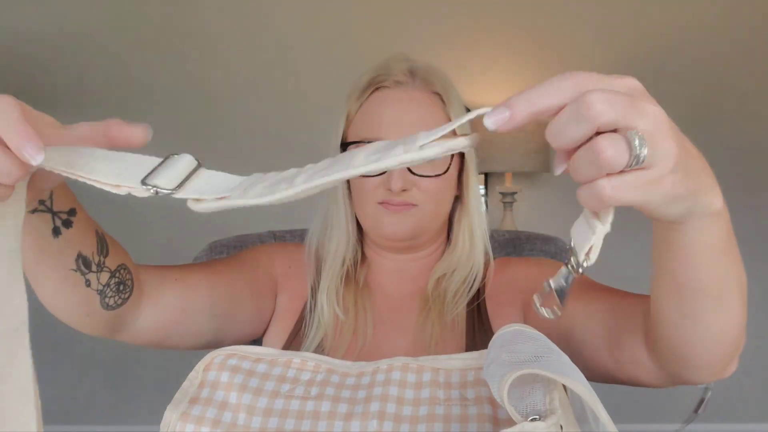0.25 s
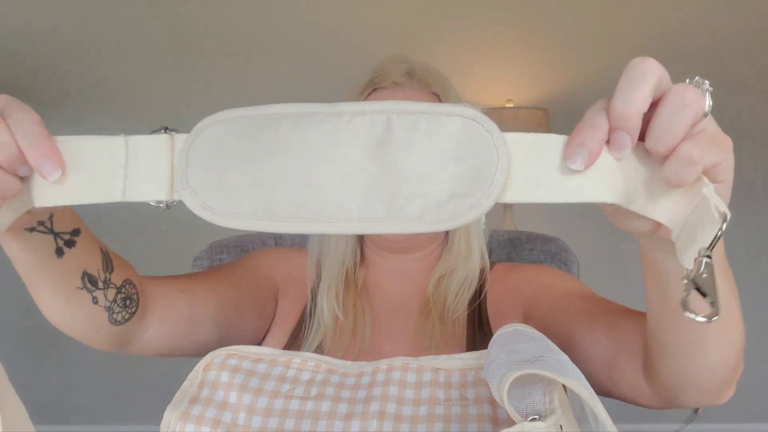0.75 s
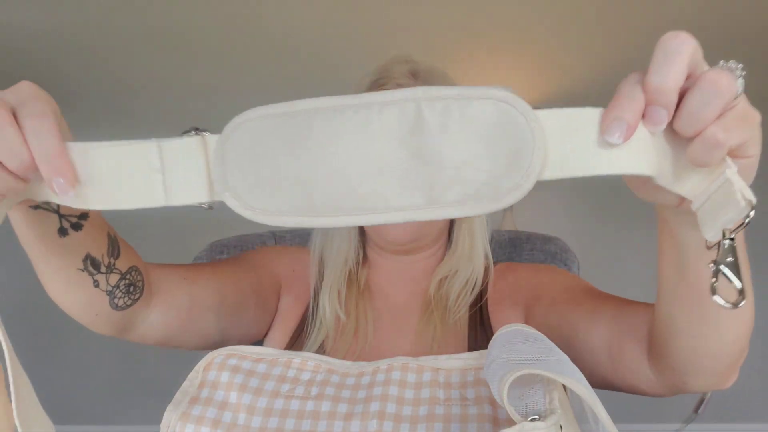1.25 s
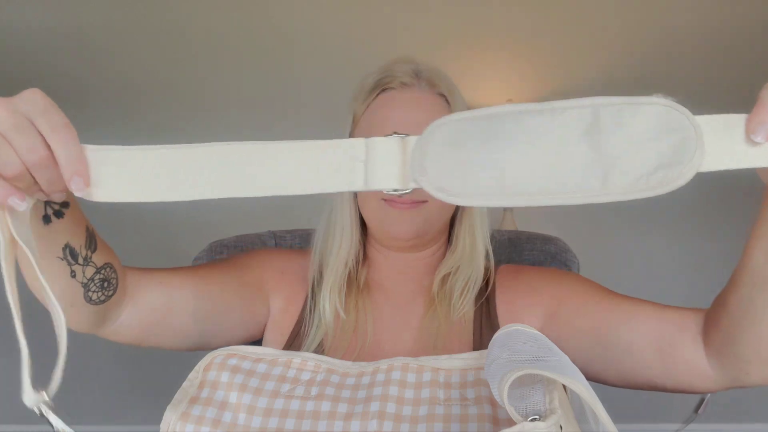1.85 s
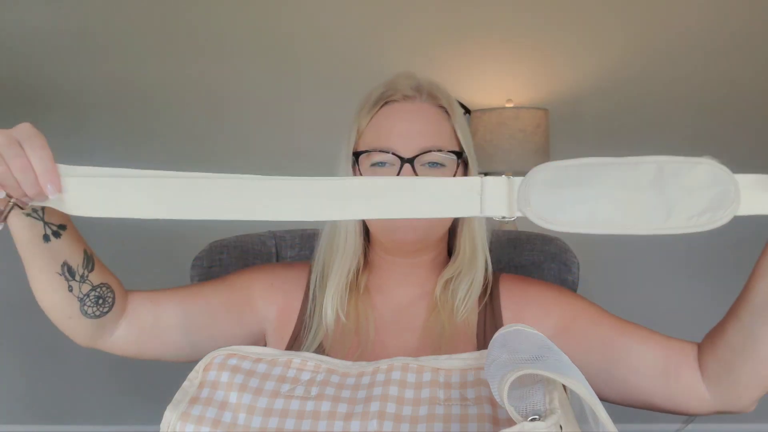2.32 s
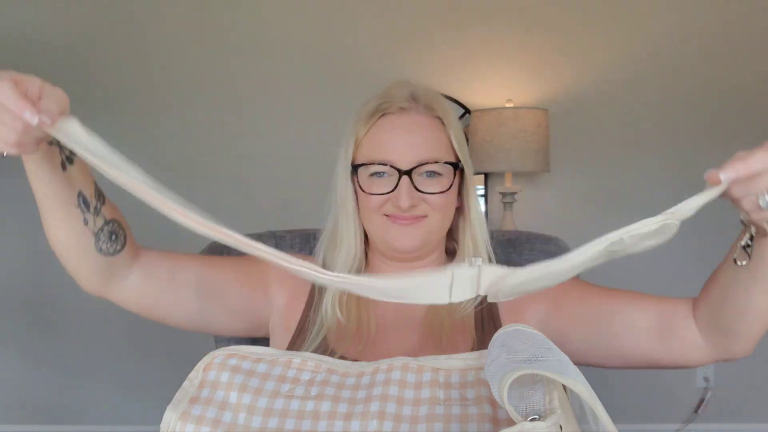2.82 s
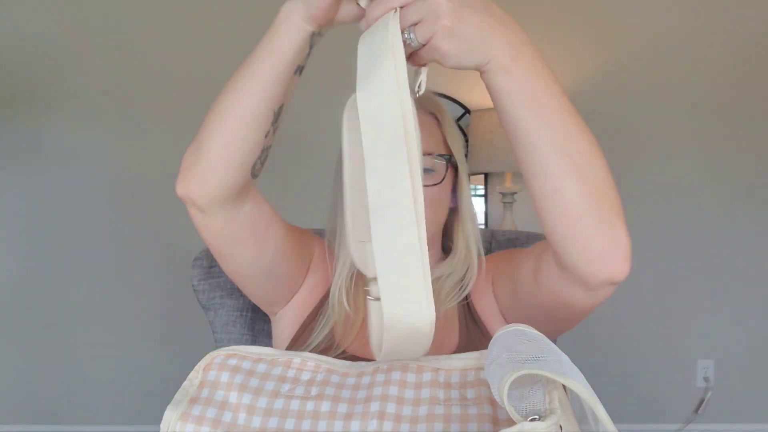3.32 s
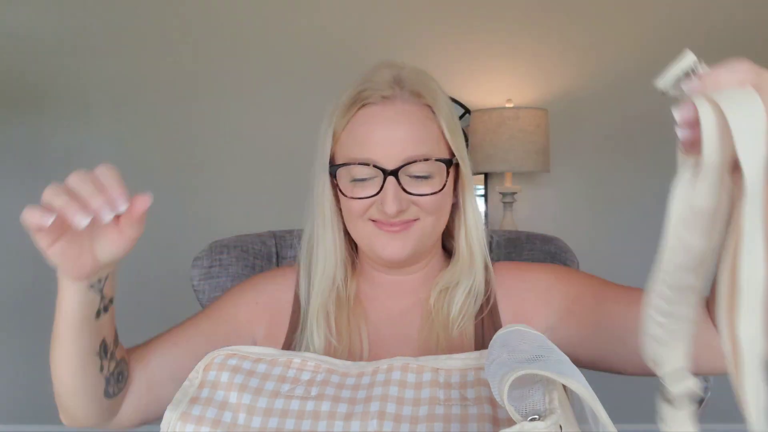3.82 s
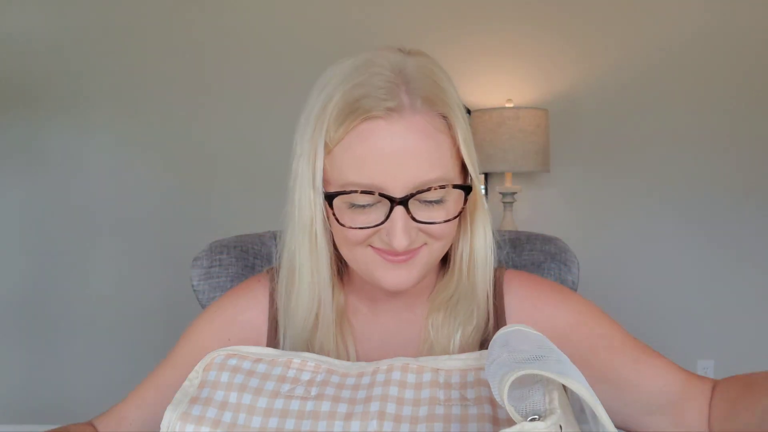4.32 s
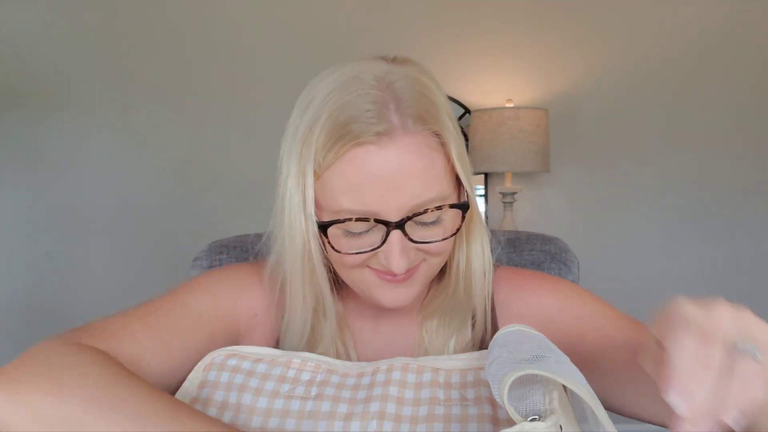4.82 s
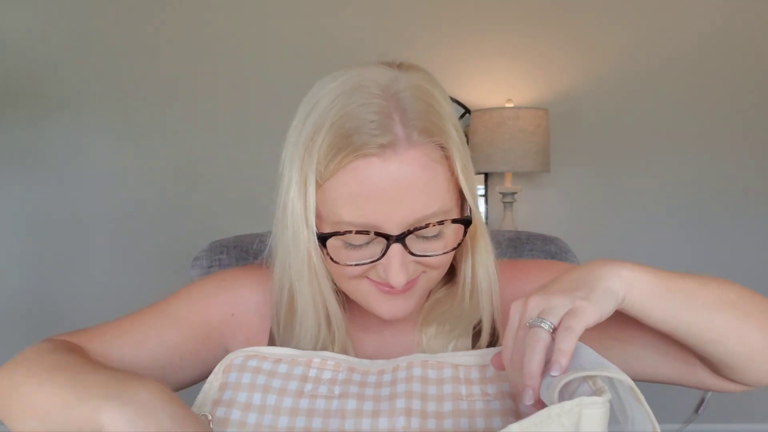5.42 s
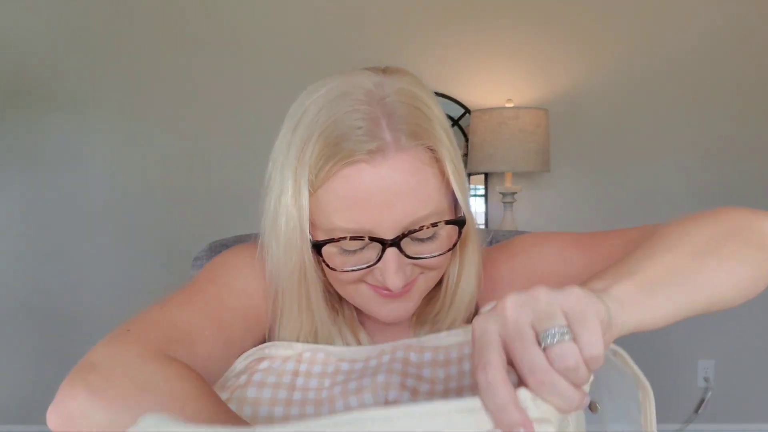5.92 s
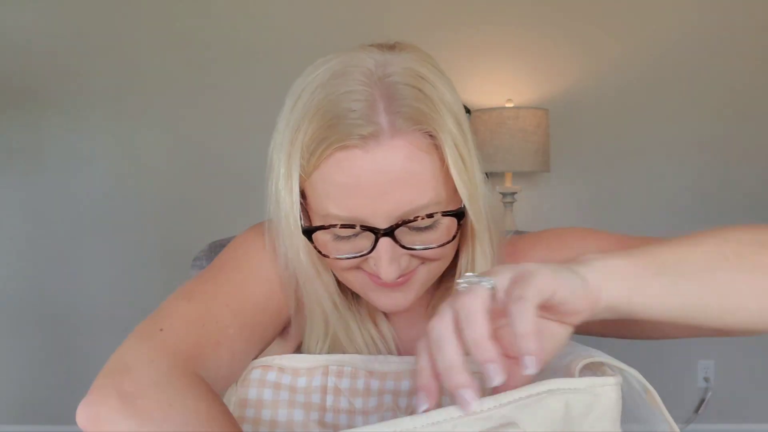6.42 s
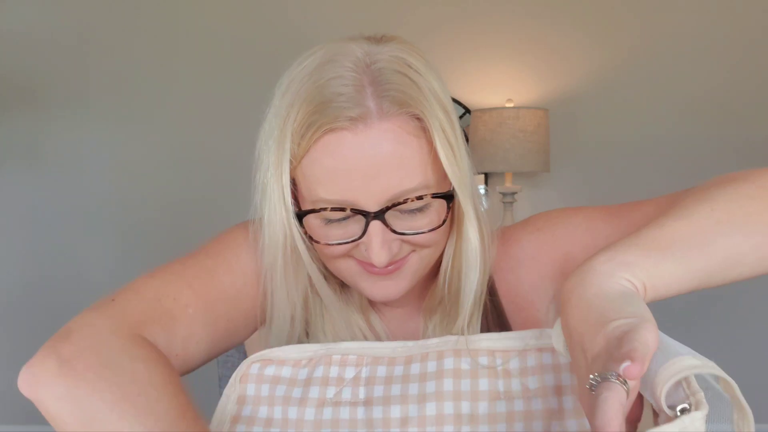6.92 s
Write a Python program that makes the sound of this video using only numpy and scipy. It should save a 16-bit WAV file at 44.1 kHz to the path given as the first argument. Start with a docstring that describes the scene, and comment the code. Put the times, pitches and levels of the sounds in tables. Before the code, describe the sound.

A small, live room with faint low rumble and hum, heard by a close stereo microphone. At about 0.1 s a padded webbing strap swishes and snaps taut with a dull, hollow pop, followed by weaker ones at 0.2-0.25 s and faint flaps until 0.5 s. Small metal clicks accompany it. From 0.7 to 3.3 s there are tiny ticks and soft webbing slides, strongest around 1.5-2.3 s, with clearer clicks near 1.75, 2.35 and 3.45 s. Loose hooks chime very faintly at 3.5-3.85 s. Around 4.7 s hooks and buckle hit the table in a sharp clustered clatter with rustling, ending by 4.85 s. Soft cloth rubbing and light pats on a bag follow from 5.3 to 6 s, with a click at 5.9. Scuffs and bumps come at 6.3 s, then a swelling drag from 6.8 s, with muffled bumps and little bright clicks near 7 s.

```python
"""Dull, hollow pops and swishes of a padded webbing strap flipped taut in a small, live room, with clinking metal.
The strap slides through the fingers, the hooks land on the table, and the bag is gripped, tipped and dragged back.
Impacts are a push plus chatter through a body spectrum and its peaks; rubbing is noise with random slips.
A close stereo microphone also hears the low rumble and hum of the room."""
import sys
import numpy as np
from scipy import signal
from scipy.fft import rfft, irfft, next_fast_len
from scipy.io import wavfile
from scipy.ndimage import map_coordinates

SR = 44100
rng = np.random.default_rng(int(sys.argv[2]) if len(sys.argv) > 2 else 0)


def log_audio(samples):
    """Write samples as a 16-bit WAV file to the path given in sys.argv[1]."""
    # one column per channel
    frames = np.atleast_2d(samples).T
    # limit to full scale, then quantise
    limited = np.clip(frames, -1, 1)
    pcm = np.round(limited * 32767).astype(np.int16)
    wavfile.write(sys.argv[1], SR, pcm)


N = 315315
TIME = np.arange(N) / SR
HIT = 2 ** 15  # samples given to one impact or room response
HIT_HZ = np.fft.rfftfreq(HIT, 1 / SR)
HIT_T = np.arange(HIT) / SR

# colour of the small metal parts: f/Hz, level/dB
METAL_COLOUR = [(600, -42), (1900, -27.5), (3200, -30.5), (4400, -9.5), (5300, 1), (6300, -1), (7500, 0.5),
                (8300, -3.5), (9300, -15.5), (11500, -7), (13500, -10.5), (16000, -8)]


def amp(db):
    """Decibels to gain."""
    return 10 ** (np.asarray(db) / 20)


def unit(x):
    """Scale to rms 1."""
    return x / np.sqrt(np.mean(x ** 2) + 1e-20)


def along(points, hz):
    """Read a curve of (f/Hz, value) points on a log frequency axis."""
    f, v = np.transpose(points)
    return np.interp(np.log(hz + 1), np.log(f), v)


def wobble(rate):
    """A random curve of straight segments, rate knots a second."""
    knots = rng.standard_normal(int(N * rate / SR) + 4)
    return map_coordinates(knots, [TIME * rate], order=1)


def filtered(x, response):
    """Shape x with a response given as a function of frequency."""
    n = x.shape[-1]
    m = next_fast_len(n + HIT // 2)
    spectrum = rfft(x, m) * response(np.fft.rfftfreq(m, 1 / SR))
    return irfft(spectrum, m)[..., :n]


def resonances(modes, f):
    """Causal response of damped resonators: f/Hz, width/Hz, peak level/dB."""
    return sum(amp(db) * 1j * f * w / (c * c - f * f + 1j * f * w) for c, w, db in modes)


def struck(spectrum, tilt_db):
    """The minimum-phase pulse that has this spectrum, tilted in dB per octave around 1 kHz."""
    # the tilt levels off below 100 Hz
    octaves = np.log2(np.maximum(HIT_HZ, 100) / 1000)
    cepstrum = irfft(np.log(amp(along(spectrum, HIT_HZ) + tilt_db * octaves)))
    # folding the cepstrum onto positive time makes the pulse causal
    cepstrum[1:HIT // 2] *= 2
    cepstrum[HIT // 2 + 1:] = 0
    return irfft(np.exp(rfft(cepstrum)))


def contact(spectrum, tilt_db, push_hz, t60, rise):
    """One smooth push carries the sound below push_hz, a brief chatter of the surfaces the rest (t60, rise in s)."""
    envelope = amp(-60 * HIT_T / t60) * (1 - np.exp(-HIT_T / rise))
    chatter = unit(rng.standard_normal(HIT) * envelope) / np.sqrt(HIT)
    corner = min(push_hz, SR / 3)
    push = signal.lfilter(*signal.butter(2, corner, fs=SR), HIT_T == 0)
    force = push + signal.lfilter(*signal.butter(2, corner, "high", fs=SR), chatter)
    return signal.fftconvolve(force, struck(spectrum, tilt_db))[:HIT]


def friction(spectrum, rate, grain_db, flutter_db, tilt_db):
    """Threads catch and slip, rate times a second on average, over the fine hiss of the weave."""
    slips = (rng.random(N) < rate / SR) * rng.standard_normal(N)
    force = rng.standard_normal(N) + amp(grain_db) * unit(slips)

    def colour(hz):
        return amp(along(spectrum, hz) + tilt_db * np.log2(hz + 20))

    return unit(filtered(force, colour) * amp(flutter_db * wobble(60)))


def stroke(start, length, db, attack, release, swell_db=0):
    """Gain of one rubbing move: it gets going, swells as it speeds up, and dies by 60 dB in release seconds."""
    t = TIME - start
    rise = np.sin(np.pi / 2 * np.clip(t / attack, 0, 1)) ** 2
    speed_db = swell_db * (np.clip(t / length, 0, 1) - .5)
    fade_db = 60 * np.clip((t - length) / release, 0, 2)
    return rise * amp(db + speed_db - fade_db)


def scatter(start, end, rate, db, tilt_db, spread_db):
    """Small contacts at loose intervals: rows of t/s, level/dB, brightness/dB per octave."""
    slots = np.arange(start, end, 1 / rate)
    late, loud, bright = rng.uniform(-1, 1, (len(slots), 3)).T
    times = slots + (1 + late) / 2 / rate
    return np.transpose([times, db + spread_db * loud, tilt_db + spread_db * bright])


def diffuse(n):
    """Stereo noise from all directions: alike in the bass, nearly unrelated in the treble."""
    # f/Hz, left-right likeness (correlation, no unit)
    likeness = [(60, .9), (250, 0.85), (640, 0.44), (1300, -0.17), (3000, 0.033), (15000, 0.29)]

    def mid_side_gains(hz):
        turn = np.arccos(np.clip(along(likeness, hz), -1, 1)) / 2
        return np.array([np.cos(turn), np.sin(turn)])

    mid, side = filtered(rng.standard_normal((2, n)), mid_side_gains)
    return np.array([mid + side, mid - side])


def room(x, wet_db, lag, early_db=-2, early_t60=0.18, gap=0.001):
    """The direct sound, lag samples later on the left, then near walls, the tail and standing waves."""
    # decay of the tail: f/Hz, t60/s
    tail_t60 = [(100, 0.48), (400, 0.66), (1200, 0.72), (3000, 0.65), (6000, 0.51), (14000, 0.34)]
    # standing waves: f/Hz, width/Hz, level before the wet gain/dB
    standing_waves = [(367, 26, 8), (560, 28, 3.5), (682, 14, -9)]
    hz, t, z = signal.stft(diffuse(HIT), SR, nperseg=256)
    decay = amp(-60 * t / along(tail_t60, hz)[:, None])
    tail = signal.istft(z * decay, SR, nperseg=256)[1][:, :HIT]
    early = diffuse(HIT) * amp(-60 * HIT_T / early_t60)
    # reflections build up over about gap seconds
    rise = 1 - np.exp(-(HIT_T / gap) ** 2)
    walls = (unit(tail * rise) + amp(early_db) * unit(early * rise)) / np.sqrt(HIT)
    walls = walls + irfft(resonances(standing_waves, HIT_HZ))

    def ear_delays(f):
        return np.exp(1j * np.pi * f * lag / SR * np.array([[-1], [1]]))

    direct = filtered(x, ear_delays)
    return direct + amp(wet_db) * signal.fftconvolve(x[None], walls, axes=1)[:, :len(x)]


def play(events, sound, wet_db, lag):
    """Each event's direct sound is set to its level (first 10 ms) and gets its own room answer."""
    out = np.zeros((2, N + HIT))
    for s, db, tilt_db in events:
        x = sound(tilt_db)
        level = np.std(x[:SR // 100])
        out[:, round(s * SR):][:, :HIT] += amp(db) * room(x / level, wet_db, lag)
    return out[:, :N]


def strap():
    """The webbing swishes round and pulls taut with dull, hollow pops from the ringing shoulder pad."""
    # the strap flaps taut: t/s, level before the side balance/dB, brightness/dB per octave
    flaps = [(.0925, -22.5, 1), (0.2166, -34.5, -1.5), (0.2568, -30.5, -1.5), (.4272, -45.5, -1),
             (.447, -47, 3.5), (.504, -53.5, 2)]
    # colour of the webbing: f/Hz, level/dB
    webbing = [(60, -20), (220, -26), (320, -4.5), (460, -5), (720, -5), (1050, -3.5), (1350, -6.5),
               (1750, -10.5), (2500, -16), (4200, -27.5), (5300, -29), (6200, -40.5), (7800, -33),
               (9500, -53.5), (15000, -52)]
    # modes of the taut shoulder pad: f/Hz, width/Hz, level/dB
    pad_modes = [(355, 78, 9.5), (556, 5.1, 13), (1014, 180, 3), (1316, 25, 12), (2350, 18, 12),
                 (3526, 90, 3), (4220, 58, 7.5)]
    # each swish starts ahead of its flap and is set by level below it
    swish_lead_s, swish_s, swish_db = 0.026, .064, -18.5

    def flap(tilt_db):
        pull = contact(webbing, tilt_db, push_hz=2090, t60=0.033, rise=0.00045)
        return filtered(pull, lambda f: 1 + resonances(pad_modes, f))

    motion = sum(stroke(s - swish_lead_s, swish_s, db + swish_db, attack=0.033, release=0.11)
                 for s, db, _ in flaps)
    swish = motion * friction(webbing, rate=820, grain_db=-0.5, flutter_db=1.0, tilt_db=2.5)
    sound = play(flaps, flap, wet_db=-3.0, lag=7.1) + room(swish, wet_db=-7.5, lag=0.83)
    # the left side is a little quieter than the right (dB)
    return sound * amp([[-.7], [.7]])


def landing():
    """Metal clatters on the table top with a brief ringing colour, and webbing rustles onto it."""
    # hooks and slider land: t/s, level before the side balance/dB, brightness/dB per octave
    landings = [(4.685, -25, -1.5), (4.7322, -22.5, 0), (4.7338, -15.5, 0.5), (4.751, -29.5, -4.5),
                (4.8045, -35, 2), (4.8235, -37, -6.5)]
    # webbing rustles onto the table just before and during the hook landings:
    # start/s, length/s, level before the side balance/dB
    rustles = [(4.669, .05, -42.5), (4.724, .099, -35)]
    # colour of the table: f/Hz, level/dB
    table = [(50, -24.5), (110, -21), (170, -7), (260, -16), (370, -4), (600, -0.5), (780, -6.5),
             (1250, -5), (1600, -4.5), (2100, -9.5), (2900, -1), (4000, -7.5), (5600, -9), (6600, -23.5),
             (8000, -19.5), (9800, -41), (14000, -30.5)]
    # narrow peaks chosen to give the landing a brief ringing colour: f/Hz, width/Hz, level/dB
    ringing_peaks = [(168, 14, 7), (979, 24, 1), (1262, 16, 3), (1362, 16, 4), (2033, 22, 3), (2246, 16, 2),
                     (2405, 20, 3), (2563, 14, 8), (2790, 18, 2), (3936, 16, 3), (4246, 16, 3)]
    # side balance: f/Hz, level up on the left and down on the right/dB
    table_side = [(1500, 0), (2800, -0.5), (5000, -1), (8000, 0), (13000, 4)]

    def knock(tilt_db):
        blow = contact(table, tilt_db, push_hz=453, t60=0.0097, rise=0.00044)
        return filtered(blow, lambda f: 1 + resonances(ringing_peaks, f))

    motion = sum(stroke(*row, attack=0.017, release=.06, swell_db=-4.5) for row in rustles)
    rustle = motion * friction(table, rate=600, grain_db=1, flutter_db=2.0, tilt_db=-1.5)
    clatter = play(landings, knock, wet_db=-2.0, lag=1.9) + room(rustle, wet_db=-1.5, lag=1.0)
    return filtered(clatter, lambda hz: amp(along(table_side, hz) * np.array([[1], [-1]])))


def metal_click(tilt_db):
    """A small metal part clicks, short and bright; each point of contact brings out other modes."""
    # modes of the metal: f/Hz, width/Hz, level/dB; frequency and level vary around these
    metal_modes = [(7480, 70, 3.5), (8000, 41, 2.5), (9700, 54, 1.5), (11500, 92, 9.5), (12770, 60, 9),
                   (13200, 90, 6.5)]
    modes = [(hz * rng.normal(1, 0.019), width, db + rng.normal(0, 3)) for hz, width, db in metal_modes]
    tap = contact(METAL_COLOUR, tilt_db, push_hz=503.8, t60=0.014, rise=.005)
    return filtered(tap, lambda f: 1 + resonances(modes, f))


def hook_chime(tilt_db):
    """A free hook rattles against its ring, feeding each mode a little differently every time."""
    # modes of a free hook: f/Hz, level/dB, t60/s
    hook_modes = [(4113, 0, .18), (5760, -2, .09), (7983, -3, .11), (9981, -17, .08), (10850, -12, .06),
                  (11720, -12, .06), (13150, -5, .08), (14190, -9, .06)]
    ring = sum(amp(db - 60 * HIT_T / t60) * np.sin(2 * np.pi * hz * HIT_T) for hz, db, t60 in hook_modes)
    rattle = contact(METAL_COLOUR, tilt_db - 2.5, push_hz=495, t60=0.037, rise=0.0042)
    # a flat spectrum leaves the colour to the modes and the tilt
    blow = contact([(1000, 0)], tilt_db, push_hz=500, t60=.018, rise=.001)
    rung = signal.fftconvolve(blow, ring)[:HIT]
    return unit(rung) + amp(-2.5) * unit(rattle)


def hardware():
    """Small metal parts, hooks and slider buckle, click and tick; hooks hanging free ring."""
    # clicks: t/s, level before the side balance/dB, brightness/dB per octave, left over right/dB
    click_rows = [(.074, -53, -9.5, -0.5), (.321, -44, 0, 3), (.5345, -57.5, -2, 3), (.626, -57.5, -4, 0),
                  (1.748, -51, -5.5, -3.5), (2.339, -45.5, 1.5, -3), (2.8, -60, -3.5, 5.5),
                  (3.452, -47, 2.5, 0.5), (3.685, -56.5, -9, 3.5), (4.723, -35.5, -5, 0.5),
                  (5.908, -47.5, -3.5, 3), (6.9125, -53, 8, 8), (6.997, -51.5, 2.5, 4)]
    # chimes: t/s, level/dB, brightness/dB per octave
    chime_rows = [(3.538, -60, 6), (3.7215, -59, -4), (3.743, -57, 8), (3.843, -59.5, 1)]
    # faint ticks while the strap is held up: from/s, to/s, ticks a second
    ticking = (.7, 3.3, 2.5)
    clicks = sum(play([row], metal_click, wet_db=-8, lag=5) * amp([[side_db / 2], [-side_db / 2]])
                 for *row, side_db in click_rows)
    tick_rows = scatter(*ticking, db=-67.5, tilt_db=0, spread_db=4.0)
    ticks = play(tick_rows, metal_click, wet_db=-6.5, lag=5.7)
    return clicks + ticks + play(chime_rows, hook_chime, wet_db=-7, lag=10.0)


def cloth():
    """Fingers slide along the webbing and over the lining, rubbing the weave; long moves start gently."""
    # cloth slides under the fingers: start/s, length/s, level/dB
    slide_rows = [(.05, .58, -75), (1.275, 0.12, -82), (1.536, .76, -71.5), (2.698, 0.12, -76.5),
                  (4.356, 0.87, -68), (5.355, 0.16, -66), (5.811, 0.12, -57.5), (6.207, 0.12, -62.5),
                  (6.517, .49, -62.5)]
    # cloth shifts faintly while it is held: start/s, length/s, level/dB
    hold_rows = [(0, 3.6, -81), (5.895, 1.4, -71.5)]
    # colour of the cloth: f/Hz, level/dB
    weave = [(150, -4.5), (400, 2.5), (800, -6.5), (1400, -4.5), (2500, -2.5), (4200, -2), (5600, -2),
             (7900, 0), (9200, -12), (12000, -12), (15500, -13)]
    attack_share = 0.27  # part of a slide that is spent getting up to speed
    slides = sum(stroke(s, length, db, attack=attack_share * length, release=0.5)
                 for s, length, db in slide_rows)
    holds = sum(stroke(*row, attack=.05, release=1.7) for row in hold_rows)
    rub = friction(weave, rate=1100, grain_db=-5, flutter_db=1.2, tilt_db=0)
    return room((slides + holds) * rub, wet_db=-1.0, lag=3.2)


def bag():
    """The soft bag is patted and bumped, tipped over with a scuff and dragged back."""
    # scuffs over the table: start/s, length/s, level/dB, swell over the stroke/dB, brightness/dB per octave
    scuff_rows = [(6.265, .05, -39.5, 11.5, 1), (6.336, 0.029, -44, -1.5, 2.5),
                  (6.655, 0.047, -57.5, 0.5, -1), (6.775, .248, -48, 14, 0.5)]
    # colour of a scuff: f/Hz, level/dB
    scuff_colour = [(30, -6), (90, -3), (170, -2), (260, -3), (370, 2), (560, 3), (730, -3), (1000, 2.5),
                    (1350, 3.5), (1600, -3), (3200, -6), (4300, -15), (5600, -18), (7000, -43),
                    (12000, -42.5)]
    # soft bumps of the bag, the last ones as it is dragged: t/s, level/dB, brightness/dB per octave
    bumps = [(4.611, -53.5, -0.5), (5.494, -52, .5), (5.645, -57.5, 1.5), (6.309, -44.5, 1),
             (6.353, -43.5, -4.5), (6.601, -49, -1), (6.691, -53, -10), (6.763, -48.5, 0.5),
             (6.938, -42.5, 0), (6.975, -45, 1), (7.004, -41.5, -6)]
    # colour of the padding: f/Hz, level/dB
    padding = [(40, -16.5), (110, -9), (250, -6), (380, -7), (550, -7), (850, -21), (2000, -25),
               (6000, -35), (15000, -59)]
    # fingers pat the bag as they feel for a grip: from/s, to/s, pats a second
    patting = (5.27, 6.05, 8)

    def scuff(s, length, db, swell_db, tilt_db):
        motion = stroke(s, length, db, attack=0.019, release=0.105, swell_db=swell_db)
        return motion * friction(scuff_colour, rate=1000, grain_db=-0.5, flutter_db=2, tilt_db=tilt_db)

    def bump(tilt_db):
        return contact(padding, tilt_db, push_hz=343, t60=0.048, rise=0.0037)

    scuffs = sum(scuff(*row) for row in scuff_rows)
    touches = [*bumps, *scatter(*patting, db=-59, tilt_db=-4.5, spread_db=-1.0)]
    return room(scuffs, wet_db=-3.5, lag=-1) + play(touches, bump, wet_db=-4.5, lag=0)


def background():
    """Low room rumble of filtered diffuse noise, with a hum of sines whose phase wanders slightly."""
    # colour of the rumble: f/Hz, relative level/dB
    rumble_colour = [(12, -44.5), (20, -13), (90, -0.5), (145, -7.5), (227, -8), (292, -8.5), (365, -15.5),
                     (510, -17.5), (554, -17), (1320, -28), (2430, -24), (4500, -30), (7440, -36),
                     (9560, -53), (15800, -51)]
    # hum tones: f/Hz, rms level/dB
    hum_tones = [(119.5, -72.5), (221, -76), (241, -76)]
    rumble = unit(filtered(diffuse(N), lambda hz: amp(along(rumble_colour, hz))))
    hum = sum(amp(db) * np.sqrt(2) * np.sin(2 * np.pi * hz * TIME + 1.3 * wobble(5.1))
              for hz, db in hum_tones)
    return amp(-63.5) * rumble + hum


def scene():
    """Strap, hardware and bag in the room."""
    return strap() + landing() + hardware() + cloth() + bag() + background()


def record(dry):
    """The microphone keeps nothing above its band limit of 15850 Hz."""
    return filtered(dry, lambda hz: hz < 15850)


dry = scene()
out = record(dry)
log_audio(out)
```